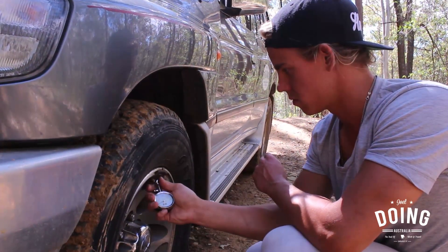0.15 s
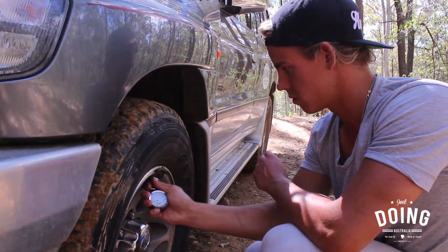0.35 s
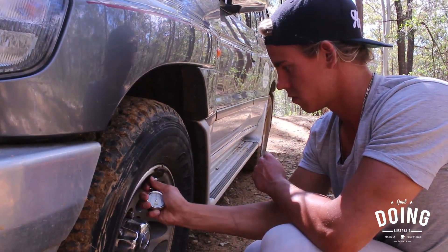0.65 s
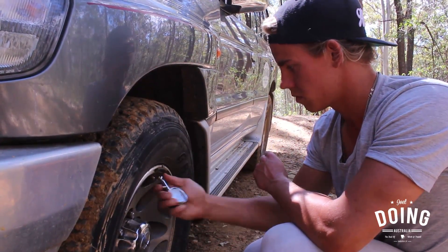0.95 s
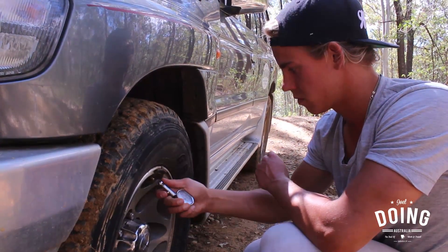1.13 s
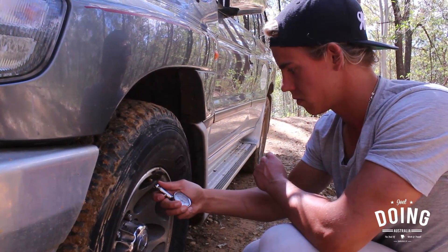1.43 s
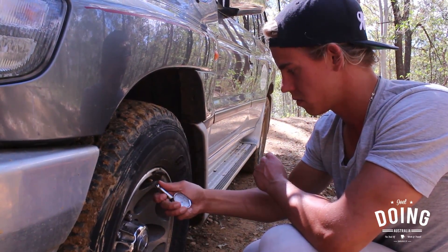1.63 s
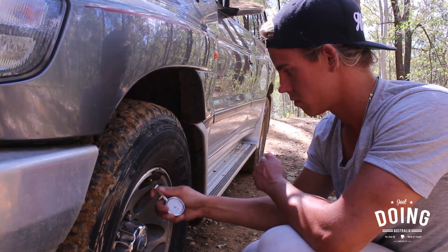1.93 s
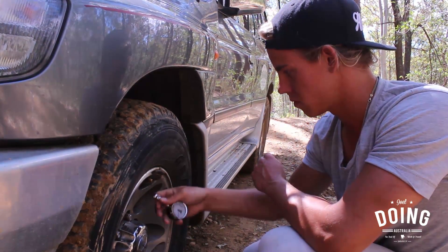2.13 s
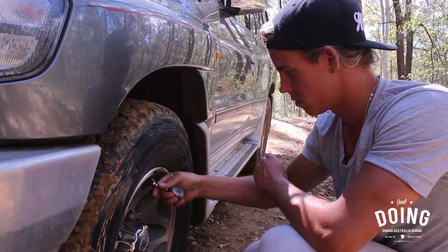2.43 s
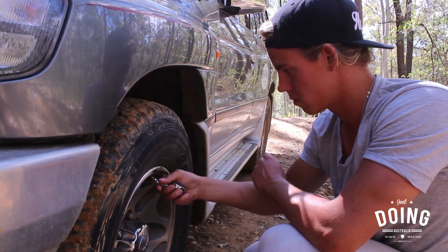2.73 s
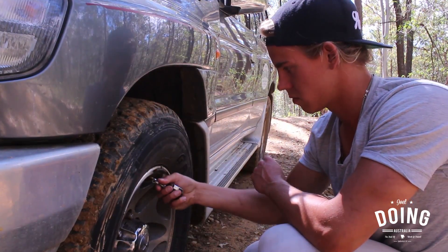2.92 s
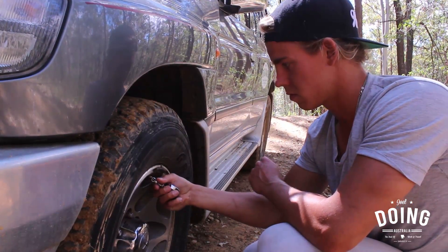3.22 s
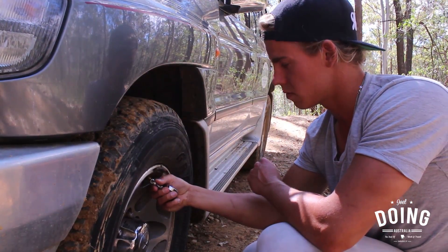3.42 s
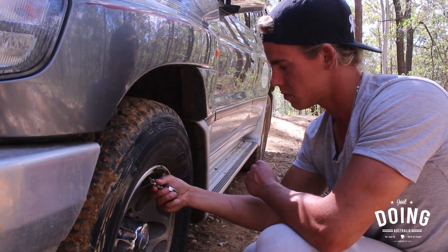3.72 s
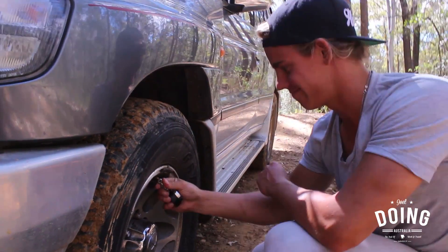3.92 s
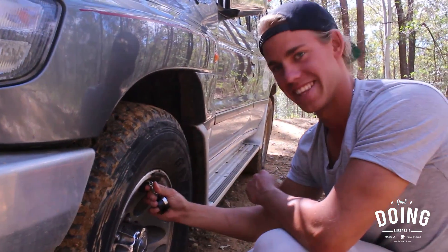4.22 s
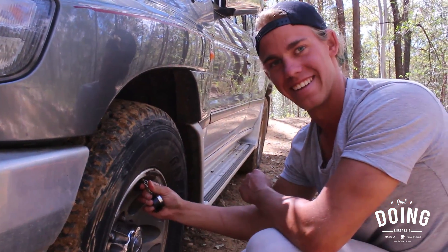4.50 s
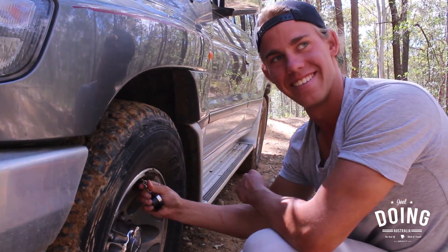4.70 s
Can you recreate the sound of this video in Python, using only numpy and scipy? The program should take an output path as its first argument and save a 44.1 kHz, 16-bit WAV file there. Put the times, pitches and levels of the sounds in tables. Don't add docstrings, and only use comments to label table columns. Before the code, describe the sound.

Metal clicks and short spits of air as a gauge is pressed onto a tyre valve, then a steady bright hiss of escaping air.

```python
import sys
import numpy as np
from scipy import signal
from scipy.fft import rfft, irfft, next_fast_len
from scipy.io import wavfile
from scipy.ndimage import map_coordinates

SR = 44100
rng = np.random.default_rng(int(sys.argv[2]) if len(sys.argv) > 2 else 0)


def to_wav(s):
    ch = np.atleast_2d(s).T
    pcm = np.round(np.clip(ch, -1, 1) * 32767)
    wavfile.write(sys.argv[1], SR, pcm.astype(np.int16))


def linear_from_db(decibels):
    return 10 ** (np.asarray(decibels, float) / 20)


N = 214087
CUT_S = 3.9205


def span(start, end, fade=0.0037):
    t = np.arange(N) / SR
    return np.clip(np.minimum(t - start, end - t) / fade, 0, 1)


def drift(rate_hz):
    low_pass = signal.butter(2, rate_hz, fs=SR, output="sos")
    slow = signal.sosfilt(low_pass, rng.standard_normal(N + SR))[SR:]
    return slow / np.std(slow)


def band(x, low_hz, high_hz):
    return signal.sosfiltfilt(signal.butter(4, [low_hz, high_hz], "band", fs=SR, output="sos"), x)


def coloured(air=None, modes=(), air_db=0, echoes=(), spread=1, white=None):
    size = next_fast_len(N)
    hz = np.arange(1, size // 2 + 2) * SR / size
    power = 0
    if air:
        air_hz, colour_db = np.transpose(air)
        power = linear_from_db(np.interp(np.log(hz), np.log(air_hz), colour_db) + air_db) ** 2
    for centre_hz, width_hz, db in modes:
        detuning = (hz - centre_hz ** 2 / hz) / (spread * width_hz)
        power = power + linear_from_db(db) ** 2 / (1 + detuning ** 2) ** 2
    ripple = 1 + sum(linear_from_db(db) * np.exp(-2j * np.pi * hz * ms / 1000) for ms, db in echoes)
    white = rng.standard_normal(N) if white is None else white
    noise = irfft(rfft(white, size) * np.sqrt(power) * ripple, size)[:N]
    return noise / np.std(noise)


def whistle(rows, flicker_hz, blur):
    s, row_hz, row_db = np.transpose(rows)
    t = np.arange(N) / SR
    hz, db = np.interp(t, s, row_hz), np.interp(t, s, row_db)
    scatter = drift(flicker_hz) + 1j * drift(flicker_hz)
    echoes = (1 + blur * scatter) / np.sqrt(1 + 2 * blur ** 2)
    tone = np.real(echoes * np.exp(2j * np.pi * np.cumsum(hz) / SR))
    return np.sqrt(2) * linear_from_db(db) * span(s[0], s[-1], .01) * tone


def trunks(x, colour, db, t60):
    tail = coloured(modes=colour)[:SR // 2] * linear_from_db(-60 * np.arange(SR // 2) / SR / t60)
    return x + linear_from_db(db) * signal.fftconvolve(x, tail / np.linalg.norm(tail))[:N]


def wood():
    # pitch_hz, level_db per Hz
    murmur_air = [(88, -23), (150, 2.5), (435, -4.5), (465, -5.5), (549, -4), (607, -6), (766, -6),
                  (1090, -6), (2410, -18), (8000, -45.5), (10400, -61), (17600, -120)]
    return linear_from_db(-72 - 0.5 + 1.1 * drift(0.83)) * coloured(murmur_air)


def wind():
    # pitch_hz, level_db per Hz
    rumble_air = [(8, -4), (25, 0), (60, 1.5), (100, -6), (160, -13.5), (300, -60)]
    # peak_s, level_db
    gusts = [(.07, -62), (.28, -64), (.66, -66), (.92, -66), (1.26, -68), (2.72, -61), (3.07, -62),
             (3.25, -65), (3.56, -70), (3.86, -65), (4.05, -66), (4.17, -57), (4.3, -63), (4.62, -66)]
    # centre_s, level_db, half_length_s, pitch_hz
    thumps = [
        (.145, -62.5, 0.0069, 325),
        (0.306, -63, 0.0072, 314),
        (0.679, -55.5, .009, 109),
        (2.89, -60, 0.0043, 520),
        (4.167, -47, 0.0073, 96),
    ]
    t, lull, gust_half_s = np.arange(N) / SR, linear_from_db(-72), .07
    thuds = sum(linear_from_db(db) * np.exp(-((t - s) / half_s) ** 2) * np.sin(2 * np.pi * hz * (t - s))
                for s, db, half_s, hz in thumps)
    blowing = lull + sum((linear_from_db(db) - lull) * np.exp(-((t - s) / gust_half_s) ** 2) for s, db in gusts)
    return blowing * coloured(rumble_air) + thuds


def rings():
    # start_s, pitch_hz, level_db, second_pitch_hz,
    # second_level_db
    knock_rings = [(.1368, 3745, -48, 3100, -51), (.1372, 5300, -59, 8600, -63),
                   (.1398, 3040, -52, 3640, -53), (.1935, 3700, -66, 5300, -68),
                   (.2047, 3725, -60, 5250, -66), (.2078, 3690, -56, 5210, -67),
                   (.2243, 3620, -60, 5180, -64), (.2275, 3560, -60, 5900, -68),
                   (.2345, 3600, -68, 1500, -68), (.2612, 3755, -61, 3300, -76),
                   (.2767, 2995, -49, 2500, -57), (.2805, 3445, -53, 2490, -57),
                   (.2838, 3690, -45, 2920, -46), (.284, 7085, -56, 5210, -60),
                   (.2885, 3560, -57, 5500, -63), (.2915, 3135, -52, 7900, -64),
                   (.2945, 3035, -51, 3700, -61), (.2985, 3100, -55, 1485, -65),
                   (.3035, 3650, -62, 3200, -62), (.1515, 3400, -65, 2900, -68),
                   (.8625, 3470, -42, 5020, -46), (.8683, 4280, -28, 5020, -33),
                    (.8694, 3500, -27.5, 4900, -27.5), (.8665, 540, -56, 5600, -37),
                    (.8712, 850, -58, 6100, -38), (.8718, 3100, -36, 6500, -40),
                    (.877, 4300, -42, 3450, -44), (.8705, 9730, -35, 3270, -36),
                    (.8745, 3500, -42, 5300, -48), (.8995, 3490, -47, 5640, -51),
                    (.9175, 3500, -51, 1465, -60), (.929, 2960, -56, 4390, -60),
                    (.913, 3400, -64, 5100, -66), (.924, 3315, -48, 1520, -55),
                    (.927, 3530, -49, 1475, -55), (.9336, 2920, -48, 4050, -57),
                    (.9393, 3830, -52, 3210, -53), (.9405, 6440, -55, 2560, -55),
                    (.9435, 3350, -58, 3900, -59), (1.628, 5800, -50, 3920, -58),
                    (1.6283, 10900, -55, 13200, -57), (1.6305, 5700, -51, 8130, -58),
                    (1.6495, 5400, -65, 5900, -68), (1.639, 5450, -65, 5040, -66),
                    (1.644, 5450, -64, 6620, -68), (2.4861, 3820, -50, 5545, -53),
                    (2.4881, 3700, -52, 5950, -55), (2.4912, 3600, -56, 5200, -60),
                    (2.4864, 8700, -61, 4900, -57), (2.4868, 1600, -63, 7200, -64),
                    (2.4868, 2215, -59, 4940, -59), (2.8875, 3415, -42, 10820, -46),
                    (2.8885, 4260, -45, 2400, -50)]
    out, length = np.zeros(N), SR // 10
    for s, *tones in knock_rings:
        first = int(s * SR) + 1
        since = (first + np.arange(length)) / SR - s
        for hz, db in zip(tones[::2], tones[1::2]):
            t60 = .019 * np.sqrt(3500 / hz)
            decay = np.clip(since / .0005, 0, 1) * linear_from_db(db - 60 * since / t60)
            out[first:first + length] += decay * np.sin(2 * np.pi * hz * since)
    return out


def knocks():
    # start_s, peak_db, upper_share_db, bright_share_db, low_share_db
    ticks = [(0.1371, -57, -7, -9, -8), (0.1875, -68, -8, -8, -8), (0.1932, -64.5, -7, -16, -6),
             (0.2062, -60, -10, -14, -6), (0.2244, -59, -7, -25, -6), (0.234, -70, -14, -25, -4),
             (0.268, -66, -10, -20, -4), (0.2617, -62.5, -14, -18, -5), (0.2772, -47.5, -22, -24, -14),
             (0.2845, -47, -11, -7, -20), (0.2964, -57, -19, -14, -3), (0.8997, -46.5, -4, -6, -7),
             (0.9171, -51, -8, -12, -8), (0.924, -51, -8, -11, -14), (0.9264, -53, -7, -9, -9),
             (0.93, -57, -5, -8, -8), (0.9336, -50, -9, -9, -13), (0.9387, -53, -3, -5, -6),
             (0.9435, -56, -6, -10, -10), (1.6075, -60, -3, -3, 3), (1.7594, -73, -9, -10, 6),
             (2.1344, -65, -16, -14, -4), (2.8874, -43, -8, -10, -8)]
    # pitch_hz, width_hz, level_db
    body_modes = [(2500, 870, -10), (3084, 270, -0.5), (3550, 410, 1.5)]
    # pitch_hz, width_hz, level_db
    upper_modes = [(4500, 670, -3), (5280, 1200, 4.5), (6160, 790, -2.5)]
    # pitch_hz, width_hz, level_db
    bright_modes = [(7500, 1800, 10), (9250, 900, 3), (10800, 1000, -4), (13500, 2300, -7)]
    # pitch_hz, width_hz, level_db
    low_modes = [(547, 110, -5.5), (940, 400, -3.5), (1600, 290, 0)]
    # pitch_hz, width_hz, level_db
    crack_modes = [(11500, 2500, 0), (14300, 2500, -1)]
    gains, t, length = np.zeros((5, N)), np.arange(N) / SR, SR // 5
    for s, db, upper_db, bright_db, low_db in ticks:
        loose = s < .6
        t60 = .033 if loose else .026
        first = int(s * SR) + 1
        since = t[first:first + length] - s
        decay = linear_from_db(db - 2.5 - 60 * since / t60) + linear_from_db(db - 5 - 60 * since / 0.0046)
        rattle = np.clip(since / 0.0004, 0, 1) * decay
        crack_db = bright_db - 10 - 40 * loose
        shares_db = [[-3], [upper_db], [bright_db], [low_db], [crack_db]]
        gains[:, first:first + length] += linear_from_db(shares_db) * rattle
    groups = (body_modes, upper_modes, bright_modes, low_modes, crack_modes)
    return sum(gain * coloured(modes=modes) for gain, modes in zip(gains, groups))


def creak():
    # time_s, pitch_hz, level_db
    creak_curve = [
        (.19, 1600, -84),
        (.21, 1600, -85),
        (.27, 1580, -77),
        (.31, 1540, -81),
    ]
    return whistle(creak_curve, flicker_hz=30, blur=.3)


def puffs():
    # peak_s, level_db, rise_s, fall_s, tail_db under the peak
    bursts = [
        (.448, -39.5, .032, .058, -45),
        (.8695, -33.5, .012, .018, -34),
        (1.61, -50.5, .003, .028, -22),
        (1.6285, -51, .001, .006, -14),
        (2.487, -54, .0008, .013, -16),
    ]
    # pitch_hz, level_db per Hz
    burst_airs = [
        [(240, -51.5), (400, -21.5), (1280, -16), (1560, -11.5), (2150, -13), (2740, -9.5), (2960, -2),
         (3890, -8), (4200, 0), (4540, -8), (5880, -8), (7400, -23), (9020, -8), (9740, -14), (15400, -13)],
        [(240, -61), (400, -43), (527, -12.5), (662, -29), (1300, -22), (1900, -16), (2750, -23), (3100, -8),
         (3720, -4), (4200, -1.5), (6650, -12), (7180, -23), (9590, -8), (11500, -18), (15400, -17)],
        [(240, -42), (400, -6.5), (2540, -15.5), (3610, -11), (3950, -7), (4610, -14), (8360, -8.5),
         (12400, -1), (15400, -14)],
        [(880, -41), (1500, -7), (2050, -27), (2350, -7), (4300, -11), (5170, 2.5), (7560, -7), (8020, -11),
         (15400, -15)],
        [(240, -42), (400, -16), (622, -9), (1440, -18), (2180, -10), (2470, -17), (3790, -2), (4560, -15),
         (5730, -5), (7610, -24), (11000, -30), (15600, -61), (22000, -120)],
    ]
    # pitch_hz, width_hz, level_db
    chuck_modes = [
        [(3010, 150, -3), (3370, 250, -8), (4150, 300, -3), (4790, 250, -4), (5540, 200, -6), (5900, 180, -7),
         (8880, 300, -10)],
        [(3060, 120, -7), (3470, 200, -4), (4280, 250, 1), (5020, 300, -3), (6520, 180, -13), (8130, 200, -12),
         (9730, 350, -7), (10800, 300, -11)],
        [(9300, 300, -3), (10600, 500, -4), (6000, 900, -10)],
        [(5450, 250, 0), (5900, 300, 0)],
        [(2900, 600, -10), (4700, 600, -9)],
    ]
    t, out = np.arange(N) / SR, np.zeros(N)
    seal_db = -10 * span(.4855, .6, .0015)
    grit = linear_from_db(.8 * drift(690) + seal_db)
    dull = signal.butter(2, 6500, fs=SR, output="sos")
    for (s, db, rise_s, fall_s, tail_db), air, modes in zip(bursts, burst_airs, chuck_modes):
        burst = np.clip(np.minimum(1 + (t - s) / rise_s, 1 - (t - s) / fall_s), 0, 1) ** 1.6
        tail = span(s, 9, fall_s) * linear_from_db(tail_db - 60 * np.clip(t - s, 0, 1) / .12)
        hiss = grit * linear_from_db(db) * coloured(air, modes, air_db=0.1)
        out += burst * hiss + tail * signal.sosfilt(dull, hiss)
    return out


def gauge():
    # pitch_hz, width_hz, level_db
    echo_colour = [(4800, 3200, 0)]
    near = knocks() + puffs()
    near -= .6 * span(.4725, .55, .002) * band(near, 2300, 6800)
    near += creak() + rings()
    return trunks(near, echo_colour, db=-37, t60=0.84)


def phrase(notes):
    rows = []
    for k, (s, length, hz, db) in enumerate(notes):
        scoop_hz = 90 if k == 0 else 90 / 4
        rest_db = min(-88, db - 8)
        rows += [(s, hz + scoop_hz, rest_db),
                 (s + min(.01, length / 3), hz + scoop_hz * .6, db),
                 (s + length * .92, hz, db - 2),
                 (s + length, hz, rest_db)]
    return rows


def swoop(s, length, rest_hz, settle_s, db):
    part = np.linspace(0, 1, 25)
    hz = rest_hz + (7400 - rest_hz) * np.exp(-length * part / settle_s)
    return np.transpose([s + length * part, hz, db - 5 * (2 * part - 1) ** 4 - 5 * part])


def birds():
    # start_s, length_s, pitch_hz, level_db
    piper = [
        [(.62, .06, 2285, -72), (.68, .105, 2305, -73), (.787, .026, 2300, -77), (.815, .05, 2285, -72),
         (.875, .04, 2300, -80), (.92, .07, 2300, -88), (1.0, .025, 2300, -86), (1.035, .07, 2300, -84),
         (1.12, .025, 2290, -84), (1.15, .04, 2295, -92), (1.19, .03, 2295, -86)],
        [(2.105, .028, 2440, -75), (2.134, .027, 2315, -76), (2.18, .022, 2300, -76), (2.205, .042, 2305, -75),
         (2.25, .026, 2300, -75), (2.29, .035, 2320, -81), (2.345, .022, 2310, -81), (2.384, .02, 2335, -80),
         (2.415, .03, 2335, -78), (2.45, .1, 2335, -84)],
    ]
    # start_s, length_s, resting_pitch_hz, settling_s, level_db
    swooper = [
        (.815, .12, 5100, .028, -80),
        (2.352, .135, 5100, .026, -80),
    ]
    pipes = sum(whistle(phrase(notes), flicker_hz=35, blur=blur) for notes, blur in zip(piper, (.25, .3)))
    swoops = sum(whistle(swoop(*call), flicker_hz=90, blur=0.45) for call in swooper)
    return pipes + trunks(swoops, [(5800, 5400, 0)], db=-5.5, t60=0.45)


def jet(flow_db, start, air, modes, grips, grip_db, air_db, flutter_db, shift, shift_s, end):
    # delay_ms, level_db
    near_echoes = [(1.45, -21.5), (2.2, -28.5), (4.7, -20.5), (7.9, -22.5)]
    gain = linear_from_db(flow_db + flutter_db * drift(28)) * span(start, end, 0.00053)
    white, late = rng.standard_normal(N), span(shift, 9, fade=shift_s)
    held = []
    for grip in grips:
        high_modes = [(hz, 2.6 * width_hz + 60, db + grip_db) for hz, width_hz, db in grip]
        held.append(coloured(air, modes + high_modes, air_db, near_echoes, 1.03, white))
    early, final = held
    return gain * ((1 - late) * early + late * final)


def opening(full_s, db, rise_db, creep_db):
    since, knee_db = np.arange(N) / SR - full_s, 2.5
    return db - knee_db * np.logaddexp(-rise_db * since / knee_db, -creep_db * since / knee_db)


def leak():
    # pitch_hz, level_db per Hz
    leak_air = [(240, -44), (400, -23), (595, -18), (672, -14), (885, -13.5), (2020, -4), (2660, -9),
                (3450, -3.5), (5210, -10.5), (12200, 1), (15400, -6.5)]
    # pitch_hz, width_hz, level_db
    leak_modes = [(1950, 170, -5), (2430, 55, -7), (3480, 75, 0), (3930, 160, -9)]
    # pitch_hz, width_hz, level_db
    leak_grips = [
        [(6950, 43, 1), (7400, 320, 4), (8770, 32, -4), (10300, 170, 1), (12400, 130, 7), (13200, 40, -1)],
        [(8500, 60, -3), (10200, 89, -3), (10800, 110, -4), (11000, 38, -6), (12700, 89, -2), (13500, 130, -4),
         (13900, 66, -4), (14100, 100, -4), (14500, 43, -6), (14900, 70, -14)],
    ]
    # start_s, starting_level_db, final_level_db, time_constant_s
    pushes = [
        (2.783, -57, -46, .06),
        (2.893, -53, -40, .14),
    ]
    t, seep_s = np.arange(N) / SR, 2.76
    flow_db = -70 - 3 + 6 * span(seep_s, 9, fade=.023)
    for s, db, final_db, lag_s in pushes:
        pushed = span(s - .003, 9, fade=.006)
        push_db = final_db + (db - final_db) * np.exp(-np.clip(t - s, 0, 1) / lag_s)
        flow_db = flow_db + pushed * (push_db - flow_db)
    air = jet(flow_db, seep_s, leak_air, leak_modes, leak_grips, grip_db=5, air_db=-0.5,
              flutter_db=0.5, shift=2.8, shift_s=0.03, end=3.03)
    return air * span(0, 3.03, fade=.04)


def open_jet():
    # pitch_hz, level_db per Hz
    open_air = [(150, -65), (250, -27), (516, -19), (703, -21.5), (1260, -13), (1950, 1.5), (2230, -18),
                (2390, -10.5), (3050, -6.5), (3500, -2), (5200, -12), (8280, -9), (15400, -14.5)]
    # pitch_hz, width_hz, level_db
    open_modes = [(538, 130, -20.5), (880, 66, -17), (2013, 120, 2.5), (2420, 140, 1), (2740, 97, -21),
                  (3480, 91, 0), (3830, 67, -2), (4220, 100, -4.5), (4740, 140, -11.5), (5070, 59, -15)]
    # pitch_hz, width_hz, level_db
    open_grips = [
        [(5700, 160, -3.5), (6070, 99, -4), (6400, 150, -8), (7340, 56, -24), (8090, 290, -1), (8950, 72, -8),
         (9350, 190, 2), (9770, 45, 3), (10200, 80, 0), (10600, 53, 6), (11050, 110, 4), (12320, 150, 4.5),
         (14950, 200, 1), (13500, 300, -4)],
        [(5600, 280, 1), (6500, 220, -1), (6700, 150, -3), (7000, 30, -2), (8050, 280, 4), (8940, 95, 3),
         (9560, 71, 0.5), (10200, 38, -12), (10640, 250, -6), (10700, 60, 2), (11900, 200, -3), (12650, 100, 0),
         (13350, 110, 0), (15300, 360, -18)],
    ]
    cracked_db = -56
    flow_db = np.maximum(opening(full_s=2.997, db=-39.4, rise_db=600, creep_db=1.2), cracked_db)
    return jet(flow_db, 2.93, open_air, open_modes, open_grips, grip_db=-10, air_db=-2,
               flutter_db=0.07, shift=3.25, shift_s=0.23, end=CUT_S)


def turned_jet():
    # pitch_hz, level_db per Hz
    turned_air = [(150, -53), (250, -24.5), (507, -12.5), (703, -13.5), (1260, -12.5), (1880, -2.5),
                  (2940, -7.5), (3880, -2), (4940, -10), (6730, -3.5), (10500, -4), (12300, -1),
                  (15400, -9.5)]
    # pitch_hz, width_hz, level_db
    turned_modes = [(493, 135, -12), (1074, 210, -8.5), (1940, 300, -14), (2460, 100, -1), (2650, 62, -1.5),
                    (3410, 180, -3.5), (3890, 100, -3), (4420, 170, -5), (4860, 62, -8), (5090, 61, -3)]
    # pitch_hz, width_hz, level_db
    turned_grips = [
        [(3150, 100, 0), (7500, 57, -1), (8400, 130, -6), (8480, 140, -4), (9400, 140, 0), (9800, 130, -4),
         (9950, 90, -4), (10700, 200, 2), (11500, 100, -5), (11700, 110, -4), (11900, 66, 1), (6550, 56, 0),
         (14000, 74, -3), (15450, 68, 6)],
        [(5750, 80, 3.5), (6510, 96, 4), (6930, 470, 2.5), (7900, 51, -3), (8280, 90, 6), (8700, 120, 6),
         (9200, 89, 1), (9530, 65, 4), (10700, 41, -3), (11400, 140, -1), (12000, 99, 4), (12200, 280, 4.5),
         (12980, 130, 3), (14000, 150, 0)],
    ]
    flow_db = opening(full_s=3.953, db=-40.6, rise_db=900, creep_db=.7)
    return jet(flow_db, CUT_S, turned_air, turned_modes, turned_grips, grip_db=-3.0, air_db=1.5,
               flutter_db=0.32, shift=3.99, shift_s=0.27, end=5)


def off_hand(x):
    lag = (1.9 + .09 * drift(1.65)) * SR / 1000
    highs = signal.sosfilt(signal.butter(2, 6500, "high", fs=SR, output="sos"), x)
    return x + linear_from_db(-11) * map_coordinates(highs, [np.arange(N) - lag], order=3)


def shaded(x):
    # start_s, end_s, low_hz, high_hz, share_removed 0-1
    finger_shades = [
        (2.89, 2.95, 4400, 6000, .35),
        (2.895, 2.94, 6200, 12000, .3),
        (2.895, 2.93, 900, 2600, .4),
        (3.92, 3.96, 4200, 6200, .6),
    ]
    return x - sum(np.clip(share, 0, 1) * span(start, end, .015) * band(x, low_hz, high_hz)
                   for start, end, low_hz, high_hz, share in finger_shades)


def valve():
    splice = 1 - span(CUT_S - .0003, CUT_S + .005, fade=.0005)
    return splice * shaded(off_hand(leak() + open_jet() + turned_jet()))


def scene():
    return np.tile(wood() + wind() + gauge() + birds() + valve(), (2, 1))


def band_limit(x):
    return signal.sosfilt(signal.butter(12, 16790, fs=SR, output="sos"), x)


def record(dry):
    # pitch_hz, level_db per Hz
    hiss_air = [(30, 8), (100, 11.5), (400, 7), (1000, 1), (3000, 4.5), (16000, 1.5)]
    hiss = linear_from_db(-73) * np.array([coloured(hiss_air), coloured(hiss_air)])
    top_cut = signal.ellip(12, .5, 70, 15740, fs=SR, output="sos")
    return band_limit(signal.sosfilt(top_cut, dry + hiss))


dry = scene()
out = record(dry)
to_wav(out)
```